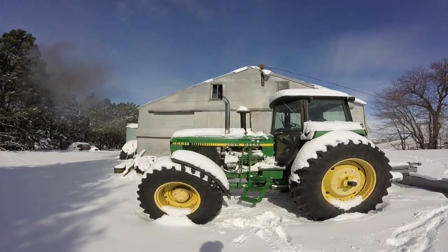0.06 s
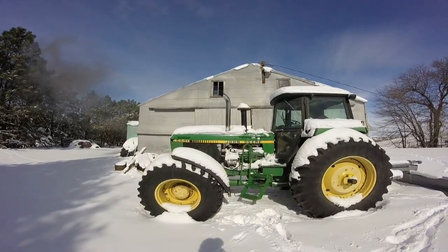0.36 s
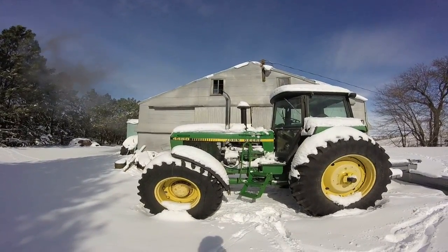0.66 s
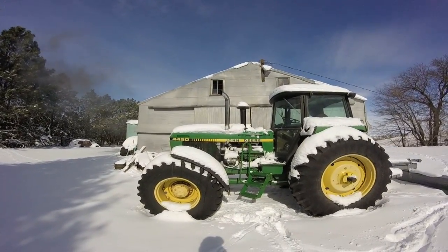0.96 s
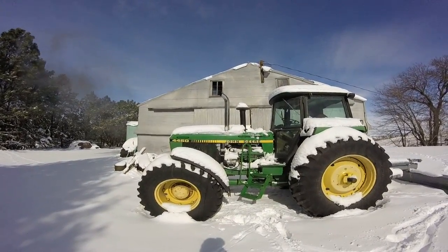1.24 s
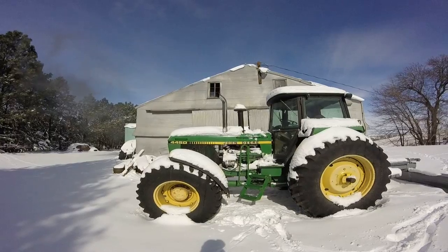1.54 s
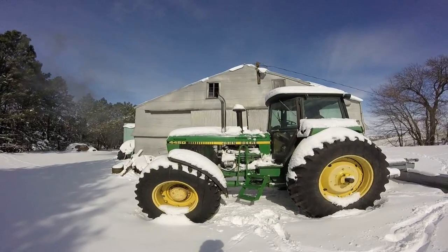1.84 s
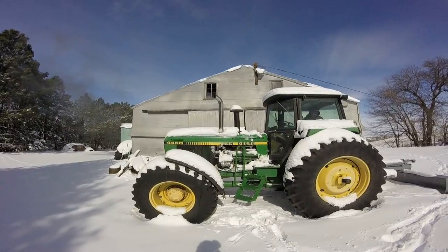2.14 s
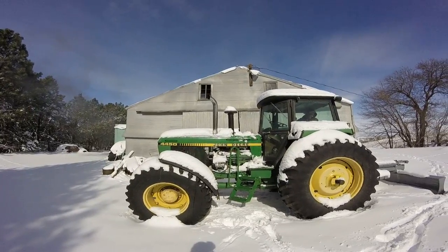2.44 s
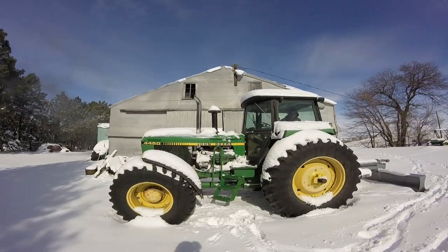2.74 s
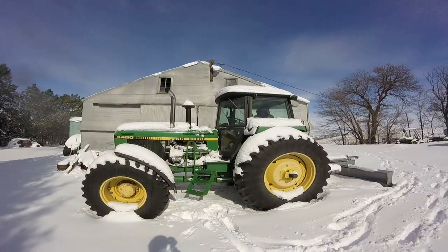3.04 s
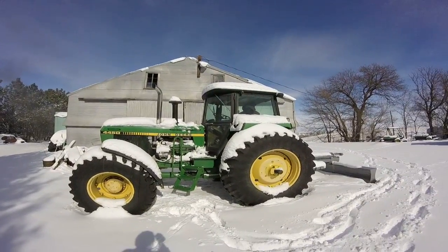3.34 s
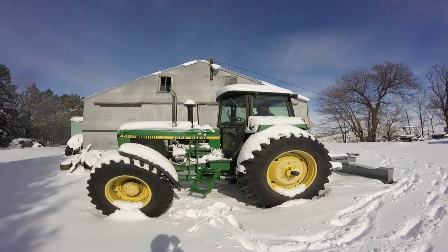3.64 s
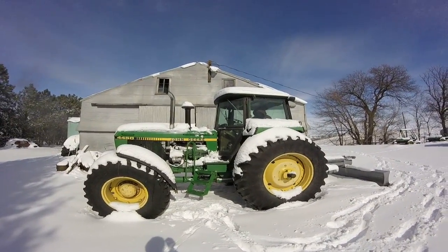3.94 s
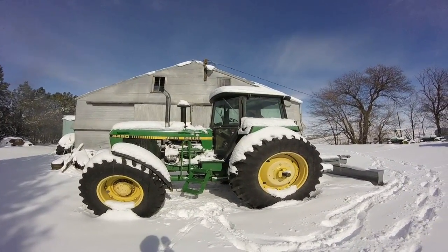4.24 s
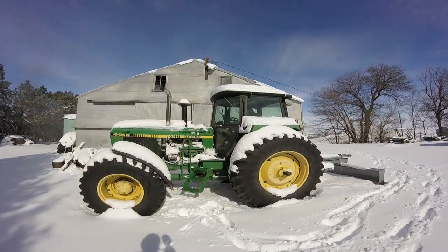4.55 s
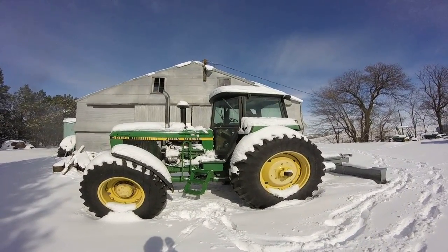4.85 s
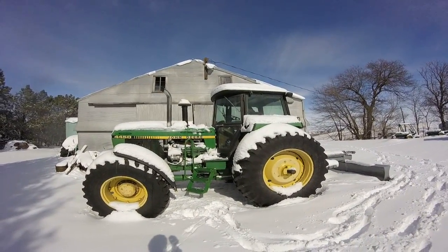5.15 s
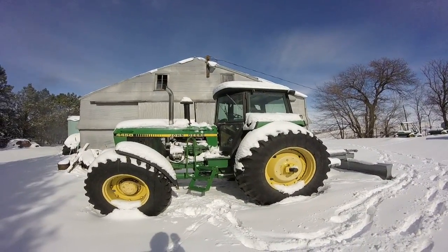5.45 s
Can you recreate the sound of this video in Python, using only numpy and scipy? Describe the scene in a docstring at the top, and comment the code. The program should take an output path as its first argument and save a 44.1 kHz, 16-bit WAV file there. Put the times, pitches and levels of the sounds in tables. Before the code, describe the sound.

A diesel tractor idles outdoors with a fast, slightly loping metallic knock over a low exhaust throb.

```python
"""A six-cylinder diesel tractor idles in a snowy farm yard, heard from a few metres to its side.
Each firing is a dull crankcase thud, then a metallic knock of block, covers and fuel lines.
Uneven cylinders make it lope; the governor hunts. The exhaust throbs underneath, gears and fan whirr.
Halfway through, the microphone turns and the treble changes colour."""
import sys
import numpy as np
from scipy import signal
from scipy.fft import rfft, irfft
from scipy.io import wavfile
from scipy.ndimage import uniform_filter1d

SR = 44100
rng = np.random.default_rng(int(sys.argv[2]) if len(sys.argv) > 2 else 0)


def bounce(signal):
    """Save signal as a 16-bit WAV file at the path given by the first command-line argument."""
    frames = np.transpose(np.atleast_2d(signal))
    limited = np.clip(frames, -1, 1)
    pcm = np.round(limited * 32767).astype(np.int16)
    wavfile.write(sys.argv[1], SR, pcm)


N = 242550
TIME_S = np.arange(N) / SR

# idle speed (time [s], firing rate [Hz])
FIRING_RATE = [(0.0, 30.82), (0.45, 30.38), (1.25, 30.88), (2.0, 30.51), (2.4, 30.83), (3.2, 30.87),
               (3.9, 31.08), (4.25, 30.71), (4.55, 31.14), (5.5, 31.36)]
# firing order (delay [s], block [dB], covers [dB], fuel lines [dB], ring [Hz], thud [Hz], thud [dB])
CYLINDERS = [(-.0008, -36, -41.6, -46.5, 1770, 616, 2.5), (-.002, -39.2, -44, -47.5, 1650, 730, -0.3),
             (-.0016, -38, -43.5, -49.5, 1660, 1130, 0.4), (-.0016, -41, -46, -49, 1820, 850, -2),
             (-.0003, -37.5, -43.5, -47.5, 1686, 790, -2), (-.0012, -36, -39, -42, 1820, 590, 2)]
# standout knocks (time [s], block [dB], covers [dB], fuel lines [dB], ring [Hz])
HARD_KNOCKS = [(0.0622, -35, -40.8, -48, 1660), (0.1931, -32.8, -38, -46, 1690),
               (0.3906, -35, -40.8, -46, 1740), (0.587, -33, -40.5, -46.5, 1750),
               (0.946, -31.5, -38, -38.5, 1860), (1.5316, -34.5, -40, -43, 1530),
               (1.565, -32.5, -44, -47.5, 1750), (2.314, -33.3, -41, -43, 2050),
               (2.7042, -33, -38.5, -43.5, 1600), (3.0928, -32, -36, -39, 2000),
               (3.1905, -31.5, -38.5, -47, 1660), (3.318, -33, -44, -51.5, 1750),
               (3.449, -30.5, -42.5, -43.5, 2000), (3.674, -30.5, -42, -43, 1555),
               (3.8691, -31, -37, -40, 1880), (3.9013, -31, -41, -41.5, 1900),
               (4.0616, -35.5, -39.5, -45.5, 1730), (4.2252, -32.5, -39.5, -44.5, 1880),
               (4.418, -33.5, -46, -49.5, 1610), (4.6125, -30.5, -38.5, -44.5, 1780),
               (4.8679, -32.5, -42, -48, 1730), (4.9333, -33, -42, -47, 1620),
               (5.028, -33, -37.5, -40.5, 2030), (5.3155, -29.5, -38.1, -43, 1490),
               (5.3797, -32.2, -41.5, -46.5, 1930)]
# governor easing off the fuel (time [s], strength loss [dB])
FUEL_DIPS = [(0.303, 9.5), (0.69, 7), (1.06, 6), (1.465, 8), (1.84, 6.5), (2.215, 3), (2.59, 7), (2.975, 5),
             (3.338, 7.5), (3.68, 5), (4.03, 11.5), (4.37, 1.5), (4.79, 6), (5.16, 2.5), (5.481, 2)]
# resonances (centre [Hz], width [Hz], relative gain before turn [dB], after turn [dB])
CRANKCASE_MODES = [(285, 40, -16.5, -16.5), (384, 45, -23, -22), (513, 61, -22.5, -26),
                   (595.7, 39.3, -18.5, -21.5), (700, 74, -20, -22.5), (789, 49, -19.5, -21.5),
                   (900, 89, -16, -17.5), (1016, 68, -22.5, -21.5), (1141, 85, -17.5, -20.5)]
BLOCK_MODES = [(1130, 64, -15, -13.5), (1350, 86, -9, -11.5), (1466.5, 128, -5.5, -3.5),
               (1600, 132, -3, -1.5), (1755, 104, -4.5, -1.5), (1998, 132, -6.5, 0), (2049, 87, -3.5, -7),
               (2267, 150, -9.5, -6), (2418, 64, -12.5, -10.5)]
COVER_MODES = [(2735, 107, -13, -26), (2830, 47, -9.5, -16.5), (3076, 161, -7, -9), (3193, 152, -9, -7.5),
               (3490, 370, -13.5, -16.5), (3708, 227, -15.5, -10.5), (3930, 216, -17, -21.5),
               (4390, 360, -25, -27)]
FUEL_LINE_MODES = [(5094, 360, -22.5, -32.5), (5967, 590, -35, -17.5), (6295, 610, -16, -17.5),
                   (6673, 107, -13.5, -14), (7160, 250, -24.5, -15), (7870, 680, -20.5, -21),
                   (8624, 150, -23.5, -20), (8820, 520, -53, -20.5), (9330, 280, -23, -29),
                   (10020, 650, -29.5, -29), (11000, 370, -40, -29), (11740, 580, -32.5, -31),
                   (13130, 1200, -33.5, -42), (14500, 1310, -58, -40.5)]
# exhaust note (multiple of firing rate [1], rms level before sag [dB])
EXHAUST_HARMONICS = [(1, -53.7), (2, -65.5), (3, -67), (4, -65.5), (5, -65), (6, -61.5)]
# fan and exhaust turbulence (frequency [Hz], relative density [dB])
RUMBLE_SPECTRUM = [(10, 5), (20, 0), (35, -6), (50, 2), (80, -1.5), (120, -3), (178, 0), (210, -6.5),
                   (290, -4), (450, -14), (700, -9), (1200, -22), (4800, -22), (9000, -42)]
# turbulence strength (time [s], level [dB])
RUMBLE_LEVEL = [(0, -55), (3.1, -54), (5.5, -54)]
# gain after the microphone turn (block [dB], covers [dB], fuel lines [dB])
TURN_GAIN_DB = (2, 1, 1.2)


def from_db(db):
    """Decibels to gain."""
    return 10 ** (np.asarray(db) / 20)


def unit_rms(x):
    """Scale to unit power."""
    return x / np.sqrt(np.mean(x ** 2) + 1e-20)


def curve(rows, at_s=TIME_S):
    """Interpolate (time, value) rows."""
    return np.interp(at_s, *np.transpose(rows))


def mic_turn(at_s, start_s=2.6, end_s=3.14):
    """Progress of the microphone turn, 0 to 1."""
    return curve([(start_s, 0), (end_s, 1)], at_s)


def governor_db(at_s, ease_off_s=0.065, pick_up_s=0.055):
    """Firing strength sags as fuel is eased off, then recovers."""
    dips_s, loss_db = np.transpose(FUEL_DIPS)
    since_s = at_s[:, None] - dips_s
    width_s = np.where(since_s < 0, ease_off_s, pick_up_s)
    return -np.exp(-(since_s / width_s) ** 2) @ loss_db


def firings(crank, blow_scatter_db=1.1, part_scatter_db=1.0, ring_scatter_oct=.05):
    """Cylinders fire in turn, fed by the governor; some knock hard. Columns as CYLINDERS, delay as time."""
    number = np.arange(int(crank[-1]) + 1)
    rows = np.array(CYLINDERS, float)[number % len(CYLINDERS)]
    scatter = rng.standard_normal((len(number), 5))
    rows[:, 0] += np.interp(number, crank, TIME_S)
    strength_db = governor_db(rows[:, 0]) + blow_scatter_db * scatter[:, 0]
    turn_db = np.outer(mic_turn(rows[:, 0]), TURN_GAIN_DB)
    rows[:, 1:4] += strength_db[:, None] + part_scatter_db * scatter[:, 1:4] + turn_db
    rows[:, 4] *= 2 ** (ring_scatter_oct * scatter[:, 4])
    for hard in HARD_KNOCKS:
        nearest = np.argmin(abs(rows[:, 0] - hard[0]))
        rows[nearest, :len(hard)] = hard
    return rows.T


def strokes(peaks_s, rise_s, decay_s, tail_db, tail_s):
    """Firing force: swell, fast fall, tail. Returns force and firing index per sample."""
    firing = np.clip(np.searchsorted(peaks_s - 3 * rise_s, TIME_S) - 1, 0, None)
    since_s = TIME_S - peaks_s[firing]
    after_s = np.maximum(since_s, 0)
    swell = np.exp(-.5 * (np.minimum(since_s, 0) / rise_s) ** 2)
    fall = np.exp(-after_s / decay_s) + from_db(tail_db) * np.exp(-after_s / tail_s)
    return swell * fall, firing


def accents(modes, centre_hz, boost_db, width_oct, scatter_db):
    """Gain per mode and firing: boost or cut near the blow's pitch, plus scatter."""
    distance = np.log2(np.array(modes)[:, :1] / centre_hz) / width_oct
    return from_db(boost_db * np.exp(-distance ** 2) + scatter_db * rng.standard_normal(distance.shape))


def radiate(drives, modes):
    """Each mode rings on its own drive; the balance shifts with the microphone turn. Unit rms."""
    turned = mic_turn(TIME_S)
    sound = 0
    for drive, (hz, width_hz, before_db, after_db) in zip(drives, modes):
        band = signal.butter(2, [hz - width_hz / 2, hz + width_hz / 2], "band", fs=SR, output="sos")
        gain = from_db(before_db) * (1 - turned) + from_db(after_db) * turned
        sound = sound + gain * signal.sosfilt(band, drive)
    return unit_rms(sound)


def crankcase_thud(times_s, strength_db, thud_hz, blow_db=-6.5, churn_db=-8.5):
    """The pressure jump of combustion hits the hollow crankcase."""
    strength = from_db(strength_db)
    blows = np.zeros(N)
    blows[np.clip((times_s * SR).astype(int), 0, N - 1)] = strength
    blows = from_db(blow_db) * unit_rms(blows)
    force, firing = strokes(times_s, rise_s=0.0016, decay_s=0.0081, tail_db=2, tail_s=0.022)
    shake = unit_rms(force * strength[firing] * rng.standard_normal(N))
    churn = from_db(churn_db) * rng.standard_normal(N)
    # each cylinder's place on the case sets its tone
    accent = accents(CRANKCASE_MODES, thud_hz, boost_db=13, width_oct=0.14, scatter_db=1.0)
    drives = [(-1) ** k * (blows * gains[firing] + shake + churn) for k, gains in enumerate(accent)]
    return radiate(drives, CRANKCASE_MODES)


def contacts(rate_hz, spread_db):
    """Tiny metal impacts, random in time and size."""
    sizes = from_db(spread_db * np.minimum(rng.exponential(1, N), 4)) * rng.choice([-1, 1], N)
    return unit_rms(sizes * (rng.random(N) < rate_hz / SR))


def rattle(modes, stroke, accent, level_db, rate_hz, spread_db, whirr_db):
    """Each firing rattles a metal part; timing gears and tappets chatter in between."""
    force, firing = stroke
    # neighbouring modes are driven from different points
    hits = [force * contacts(rate_hz, spread_db) for _ in range(2)]
    gears = [contacts(rate_hz=2500, spread_db=5.0) for _ in range(2)]
    ringing = radiate([hits[k % 2] * gains[firing] for k, gains in enumerate(accent)], modes)
    whirr = radiate([gears[k % 2] for k in range(len(modes))], modes)
    # each firing delivers its set energy, however the contacts fall
    power = np.bincount(firing, ringing ** 2, len(level_db)) / (N / len(level_db))
    gain = from_db(level_db) / np.sqrt(power + 1e-6)
    return uniform_filter1d(gain[firing], size=130) * ringing + from_db(whirr_db) * whirr


def block_knock(times_s, level_db, ring_hz):
    """Combustion knock: cast iron clanks at the pitch the cylinder favours."""
    stroke = strokes(times_s - .0042, rise_s=0.003, decay_s=0.0026, tail_db=-5.5, tail_s=0.011)
    accent = accents(BLOCK_MODES, ring_hz, boost_db=7.5, width_oct=0.12, scatter_db=1.0)
    return rattle(BLOCK_MODES, stroke, accent, level_db - .1, rate_hz=4500, spread_db=2, whirr_db=-46.5)


def cover_clatter(times_s, level_db, ring_hz):
    """Thin valve cover and side panels follow the block, about an octave up."""
    stroke = strokes(times_s - .0011, rise_s=0.0035, decay_s=0.0048, tail_db=-8, tail_s=0.01)
    accent = accents(COVER_MODES, 2.03 * ring_hz, boost_db=2.5, width_oct=0.11, scatter_db=2)
    return rattle(COVER_MODES, stroke, accent, level_db + .1, rate_hz=5000, spread_db=5.5, whirr_db=-57)


def fuel_line_tick(times_s, level_db):
    """Injectors snap shut; their pipes tick."""
    stroke = strokes(times_s - .001, rise_s=0.0034, decay_s=0.0064, tail_db=-26, tail_s=0.0055)
    centre_hz = np.full(len(times_s), 6600)
    accent = accents(FUEL_LINE_MODES, centre_hz, boost_db=-1.5, width_oct=0.15, scatter_db=1.5)
    return rattle(FUEL_LINE_MODES, stroke, accent, level_db + 0.075,
                  rate_hz=14000, spread_db=1.5, whirr_db=-65.5)


def firing_phase_rad(crank, lead_s):
    """One cycle per firing, advanced by lead_s."""
    return 2 * np.pi * (crank + lead_s * curve(FIRING_RATE))


def exhaust_throb(crank, sag_ratio=0.76):
    """Muffled stack puffs: low harmonics of the firing rate, sagging with weak firings."""
    phase_rad = firing_phase_rad(crank, lead_s=0.00753)
    note = sum(np.sqrt(2) * from_db(db) * np.cos(k * phase_rad) for k, db in EXHAUST_HARMONICS)
    return from_db(sag_ratio * governor_db(TIME_S)) * note


def flow_rumble(crank, puff_db=2.5):
    """Fan and exhaust turbulence, surging with each puff."""
    hz, db = np.transpose(RUMBLE_SPECTRUM)
    bins_hz = np.maximum(np.arange(N // 2 + 1) * SR / N, 1)
    shape = from_db(np.interp(np.log(bins_hz), np.log(hz), db, left=-np.inf, right=-np.inf))
    puffs = from_db(puff_db * np.cos(firing_phase_rad(crank, lead_s=0.0093)))
    turbulence = irfft(rfft(puffs * rng.standard_normal(N)) * shape, N)
    return from_db(curve(RUMBLE_LEVEL)) * unit_rms(turbulence)


def scene():
    """The crank times all layers. No echoes: snow absorbs them."""
    crank = np.cumsum(curve(FIRING_RATE)) / SR   # position [firings]
    times_s, block_db, covers_db, lines_db, ring_hz, thud_hz, thud_db = firings(crank)
    block = block_knock(times_s, block_db, ring_hz)
    covers = cover_clatter(times_s, covers_db, ring_hz)
    lines = fuel_line_tick(times_s, lines_db)
    # the thud leads the knock and varies far less
    thud = from_db(-54) * crankcase_thud(times_s - .0115, thud_db + .25 * block_db, thud_hz)
    return (thud + block + covers + lines + exhaust_throb(crank) + flow_rumble(crank))[None]


def record(dry):
    """Steep low-pass."""
    cutoff_hz = 15400
    return signal.sosfilt(signal.ellip(10, .1, 80, cutoff_hz, fs=SR, output="sos"), dry)


dry = scene()
out = record(dry)
bounce(out)
```